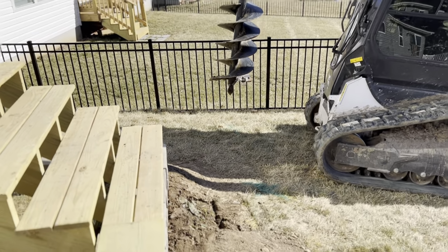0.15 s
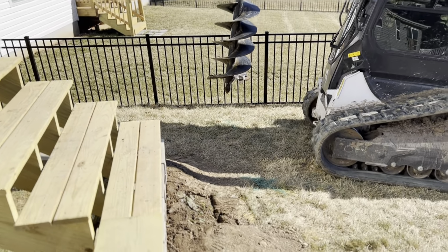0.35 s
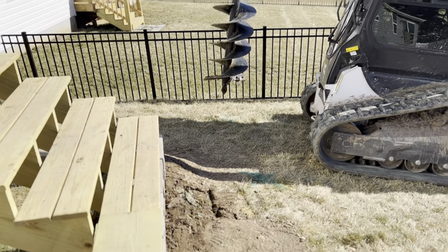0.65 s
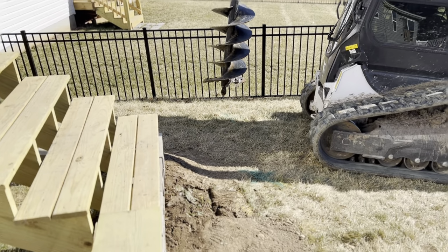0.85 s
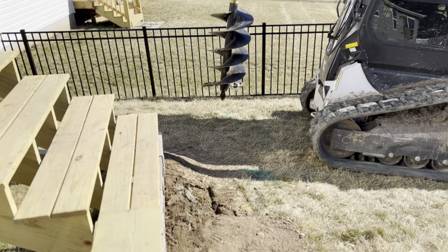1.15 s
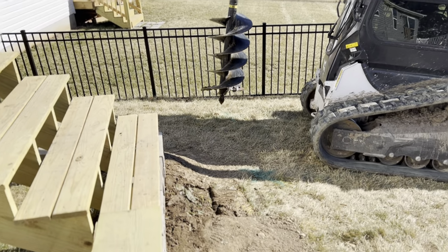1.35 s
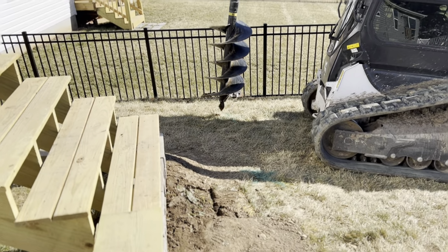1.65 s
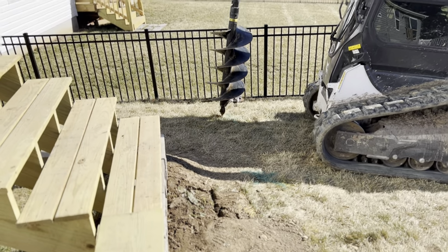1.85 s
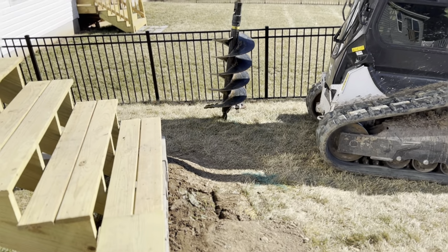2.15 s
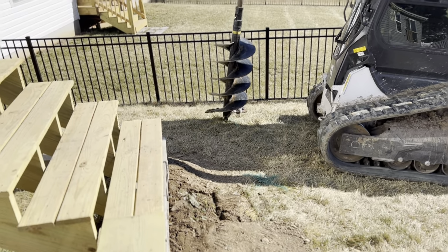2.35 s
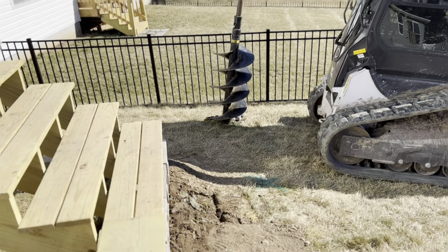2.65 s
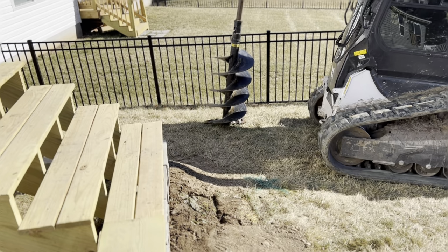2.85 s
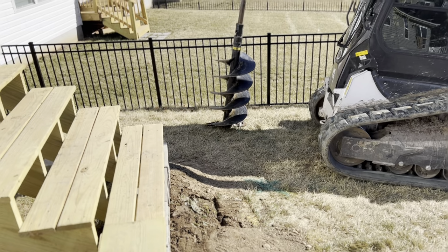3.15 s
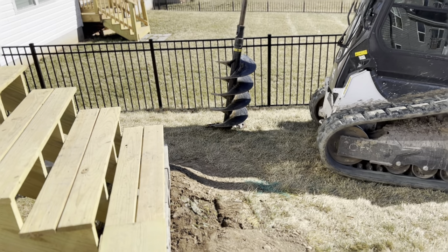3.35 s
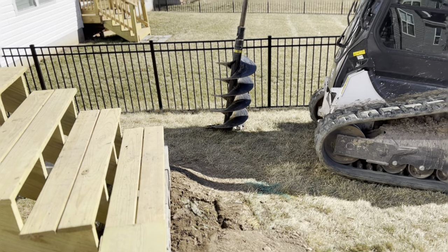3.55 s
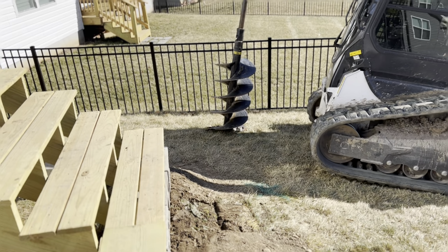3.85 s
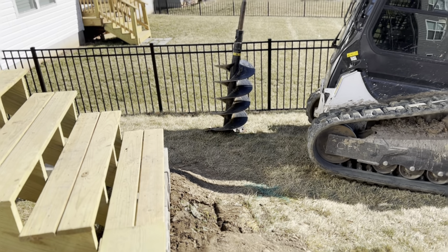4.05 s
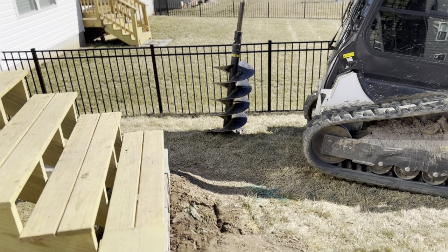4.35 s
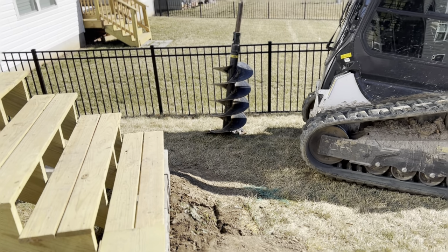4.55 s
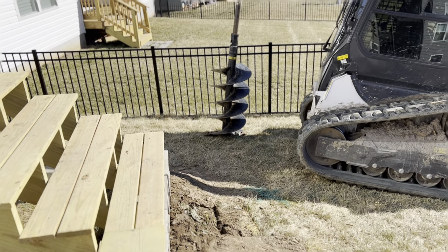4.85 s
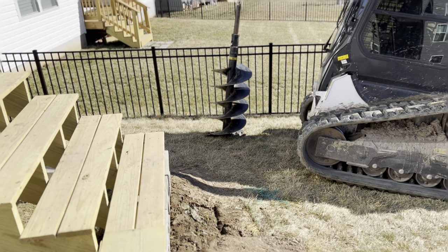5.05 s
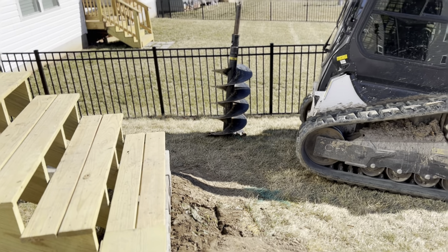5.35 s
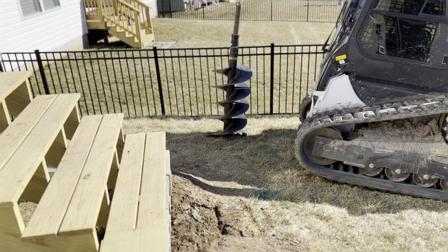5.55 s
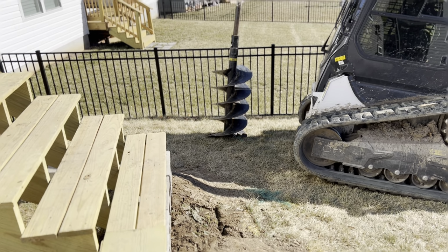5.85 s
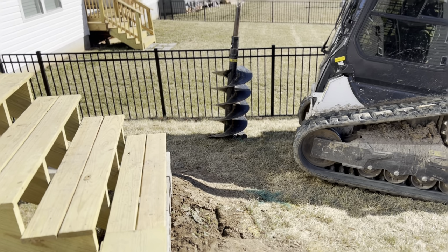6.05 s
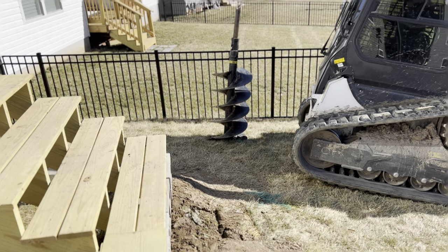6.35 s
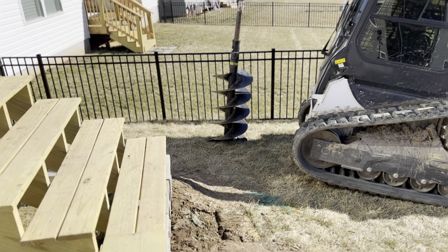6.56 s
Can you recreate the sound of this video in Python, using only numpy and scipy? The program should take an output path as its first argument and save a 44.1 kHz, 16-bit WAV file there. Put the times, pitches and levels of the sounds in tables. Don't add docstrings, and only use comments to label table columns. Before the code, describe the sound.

Steady, dense machine noise outdoors, picked up in stereo by a phone a few metres away: droning diesel exhaust, hissing injector and valve clatter, a repeating rattle and broadband fan roar. Pump whine is restrained at first, dips, then swells after three seconds as pressure builds. Short low thuds and metallic rings come from the arm after four seconds, again later, and once faintly near the end.

```python
import sys
import numpy as np
from scipy import signal
from scipy.fft import rfft, irfft, next_fast_len
from scipy.io import wavfile
from scipy.ndimage import uniform_filter1d

SR = 44100
rng = np.random.default_rng(int(sys.argv[2]) if len(sys.argv) > 2 else 0)


def file_out(sig):
    cols = np.atleast_2d(sig).T
    lim = np.clip(cols, -1, 1)
    pcm = np.round(lim * 32767).astype(np.int16)
    wavfile.write(sys.argv[1], SR, pcm)


def decibels_to_gain(level_db):
    exponent = np.asarray(level_db, float) / 20
    return 10 ** exponent


N = 295911
T = np.arange(N) / SR
SIZE = next_fast_len(N)
FREQ = np.arange(SIZE // 2 + 1) * SR / SIZE


def curves(table):
    s, *columns = np.transpose(table)
    return [np.interp(T, s, c) for c in columns]


def on_log(table, column=1):
    rows = np.array(table, float)
    return np.interp(np.log(FREQ + 1), np.log(rows[:, 0]), rows[:, column])


def between(load, free, loaded):
    return free + load * (loaded - free)


def walk(rate_hz):
    hold = int(SR / rate_hz)
    steps = np.repeat(rng.standard_normal(N // hold + 1), hold)
    return 1.3 * uniform_filter1d(uniform_filter1d(steps, hold), hold)[:N]


def ports(direct, diffuse):
    # f/Hz, left minus right/dB, likeness [0-1], left lag/rad
    port_pair = [(60, 2, 0.94, .05), (298, 0.5, 0.98, 0.15), (696, -3, 0.95, 0.86), (1130, 0.5, 0.83, 1.04),
                 (1760, -3, 0.7, 2.07), (2320, -3, 0.72, 1.1), (2370, -2.5, 0.85, .3),
                 (3080, -1.1, 0.64, 2.86), (4030, 0, 0.35, 2.57), (5400, 9.5, 0.66, 1.53),
                 (6300, -3, 0.3, 0.33), (7700, 4.5, 0.16, 1.4), (9050, -0.5, 0.5, 1.7)]
    like = np.clip(on_log(port_pair, column=2), 0, 1)
    tilt = decibels_to_gain(on_log(port_pair) / 2)
    delayed = direct * np.exp(-1j * on_log(port_pair, column=3))
    left = like * delayed + np.sqrt(1 - like ** 2) * diffuse
    return np.array([left * tilt, direct / tilt])


def noise_pair():
    return ports(*rfft(rng.standard_normal((2, SIZE))))


def bands(pair, colour, flicker_db, rate_hz, gate=lambda hz: 1):
    out = 0
    third = 3 * np.log2(FREQ + 1)
    pair = pair * decibels_to_gain(on_log(colour)) * np.sqrt(SR / 2)
    low, high = np.log2(colour[0][0]), np.log2(colour[-1][0])
    for hz in 2 ** np.arange(low, high + 1 / 3, 1 / 3):
        window = np.cos(np.pi / 2 * np.clip(third - 3 * np.log2(hz), -1, 1)) ** 2
        band = irfft(pair * window, SIZE)[:, :N]
        out = out + band * decibels_to_gain(flicker_db * walk(rate_hz)) * gate(hz)
    return out


def tone(turns, order, db, pan_db, drift, lag_rad, start_rad=None):
    if start_rad is None:
        start_rad = rng.uniform(-np.pi, np.pi)
    phase = 2 * np.pi * order * turns + start_rad + drift * walk(2.91)
    gain = np.sqrt(2) * decibels_to_gain(db + 2.7 * drift * walk(4.004))
    left = decibels_to_gain(pan_db / 2) * np.sin(phase - lag_rad)
    right = decibels_to_gain(-pan_db / 2) * np.sin(phase)
    return gain * np.array([left, right])


def engine(turns, load, drone_db):
    # order [per crank turn], unloaded/dB, loaded/dB, left minus right/dB
    exhaust = [(2.0, -24, -23, -1.5), (2.5, -68, -42, -1), (3.0, -39, -35, 1), (3.5, -84, -62, 5),
               (4.0, -34, -37.5, -0.5), (4.5, -41.5, -36.5, -6.5), (5.0, -32.5, -33.5, 0),
               (5.5, -51, -46, 18), (6.0, -38.5, -38.5, -4), (6.5, -77, -85, 2), (7.0, -28, -35.5, -0.5),
               (7.5, -49.5, -38, -6), (8.0, -49, -39, 9), (10.5, -52.5, -48, 20), (11.0, -56, -57, -15),
               (11.5, -50.5, -55, 0), (12.0, -46, -54, -12), (12.5, -48.5, -46, 9.5)]
    # order [per crank turn], unloaded/dB, loaded/dB, left minus right/dB
    gears = [(14.0, -42, -52, -1), (15.0, -43, -46.5, -3), (16.0, -40.5, -48.5, -6), (17.0, -54, -53, 18.5),
             (19.0, -56, -65, -4), (21.0, -60, -60, 15), (23.0, -47, -52.5, 1), (24.0, -44, -41.5, 2.5),
             (25.0, -48, -97, -1), (26.0, -49.5, -43, 0), (28.0, -91, -47, 2), (29.0, -58, -53, -2),
             (30.0, -77, -63, -8)]
    out = tone(turns, 2, drone_db, exhaust[0][3], 0.03, 0.08, start_rad=2.2)
    for order, free_db, loaded_db, pan_db in [*exhaust[1:], *gears]:
        blow_rad = 1.0 - 0.35 * order if order % 2 == 0 else 0.37
        lag_rad = order * (0.028 + 0.017 * rng.standard_normal())
        db = between(load, free_db, loaded_db)
        start_rad = blow_rad if order <= 8 else None
        out += tone(turns, order, db, pan_db, 0.11 + 0.014 * order, lag_rad, start_rad)
    return out


def pump(turns, load, travel_db):
    lines = [(9, -26.5, -26.5, 1, 0), (27, -33.5, -40.5, 0.47, 0.0058), (18, -27, -27, 0.058, 1),
             (36, -43.5, -44.5, 0.12, 0.18), (54, -46, -51, 0.12, .4), (10, -37.5, -31.5, 0.65, 0.079),
             (13, -36, -44.5, 0, 0.034), (20, -36.5, -48, 0, 0), (22, -40, -46.5, 0, 0.015)]
    # t/s, level/dB
    lift_pump = [
        (0, -54),
        (1.0, -43),
        (2.1, -44),
        (2.7, -53),
        (2.9, -35),
        (3.45, -26),
        (4.5, -26.5),
        (5.2, -29),
        (6.71, -29),
    ]
    # t/s, length/s, line [strokes per turn], change/dB
    valves = [(.1, 0.46, 20, -22), (.22, 0.07, 10, 11), (.52, 0.25, 10, 11.5), (1.203, 0.25, 10, 10),
              (1.75, .3, 54, 8.5), (2.1, .2, 20, -4), (2.95, 0.58, 27, -32), (3.361, 0.14, 36, 3),
              (3.36, .15, 54, 5), (3.75, 0.32, 36, -17), (3.681, 0.13, 54, -12), (4.404, 0.28, 54, 7),
              (5.25, 0.17, 10, 1), (4.85, 0.32, 54, 11), (5.198, .12, 54, 7), (5.8, .15, 36, -11),
              (5.603, 0.22, 54, 4.5), (6.0, 0.53, 20, 9), (6.0, 0.18, 27, -15), (6.3, .2, 54, 8),
              (6.45, .12, 27, -13), (3.8, .3, 27, 5), (5.35, .3, 27, 3), (5.4, .5, 36, 4),
              (6.6, 0.3, 10, -7)]
    # order [per crank turn], unloaded/dB, loaded/dB, left minus right/dB
    whistles = [(33.5, -50, -61, -8), (43.5, -50, -60, -6), (53.5, -55, -66, 0), (63.4, -55.5, -54, 3),
                (71.64, -60, -57, 1), (84, -57.5, -68, 9), (129.8, -60, -66, 6.5), (143.5, -71, -74, 3),
                (168.5, -65, -68, 0), (181, -60, -70, -3.5)]
    pans_db = 2.2, -0.8, 1.5, -3.5, -4.5, 2.2, -0.3, -3.2, 3.2
    lags_rad = -1.05, -0.4, 0.3, 0.7, -0.3, 0.3, 0.4, 0.7, -0.9
    in_step_rad = {9: -1.9, 10: -0.1}
    engaged = np.clip((load - 0.17) / 0.38, 0, 1)
    travel_swing_db = travel_db + 27
    lift_swing_db = curves(lift_pump)[0] + 27
    out = 0
    for line, pan_db, lag_rad in zip(lines, pans_db, lags_rad):
        order, free_db, loaded_db, by_travel, by_lift = line
        order = round(order)
        db = between(engaged, free_db, loaded_db) + by_travel * travel_swing_db + by_lift * lift_swing_db
        for s, length_s, valve_order, change_db in valves:
            if round(valve_order) == order:
                db = db + change_db * np.exp(-(2 * (T - s) / length_s) ** 2 / 2)
        out += tone(turns, order, db, pan_db, 0.11, lag_rad, in_step_rad.get(order))
    for order, free_db, loaded_db, pan_db in whistles:
        out += tone(turns, order, between(engaged, free_db, loaded_db), pan_db, 1.0, 0.92)
    return out


def clatter(turns, db):
    # f/Hz, density/dB per Hz
    colour = [(2200, -4), (3000, -11), (3700, -0.5), (4400, -11), (5000, -3), (5700, -6.5), (6500, -9.5),
              (7800, -9.5), (9000, -9.5), (10200, -16), (11400, -12.5), (13500, -12.5), (15000, -18.5),
              (15700, -20)]
    cylinder = np.array([1.3, 0.3, 0.9, 0.6])[(2 * turns).astype(int) % 4]
    burst = 1 + 0.17 * cylinder * np.exp(-(2 * turns % 1) / 0.25)

    def gate(hz):
        return burst * decibels_to_gain(1.4 * min(hz / 8000, 1) * walk(700))

    sound = bands(noise_pair(), colour, 1.1, 7, gate)
    return sound / np.std(sound) * decibels_to_gain(db + 1.77)


def repeating(turns, count=9):
    # f/Hz, density/dB per Hz
    colour = [(480, -77), (600, -67), (1100, -63), (1300, -68.5), (1900, -68.5), (2600, -73), (4000, -80),
              (6000, -87), (8500, -87)]
    patterns = rng.standard_normal((count, 2, 2048))
    place = ((turns / 2 % 1) * 2048).astype(int)
    age = T / T[-1] * (count - 1)
    paths = np.zeros((2, N))
    for k in range(count):
        fade = np.cos(np.pi / 2 * np.clip(age - k, -1, 1))
        paths += fade * patterns[k][:, place]
    firing = 1 + 0.5 * np.exp(-(2 * turns % 1) / 0.3)
    return bands(ports(*rfft(paths, SIZE)), colour, 1.5, 3, lambda hz: firing)


def knocks():
    # t/s, thud/dB, thud f/Hz, ring/dB, ring f/Hz
    blows = [
        (4.215, -29, 113.1, -26, 263),
        (4.263, -32, 114, -30, 345.6),
        (4.444, -19, 109.9, -24, 340),
        (4.48, -35, 113, -20.5, 262),
        (4.5, -32, 112, -28, 386),
        (4.524, -30, 124, -38, 162),
        (5.35, -38, 150, -25.5, 268),
        (5.379, -24, 107, -24, 355),
        (5.586, -25, 58.3, -36, 150.3),
        (6.399, -37, 112, -30, 344.6),
    ]
    out = np.zeros(N)
    band = signal.butter(4, [210, 720], "band", fs=SR, output="sos")
    crack = signal.sosfilt(band, rng.standard_normal(N))
    crack = crack / np.std(crack)
    for s, thud_db, thud_hz, ring_db, ring_hz in blows:
        age = np.clip(T - s, 0, None)
        decay = 3.2 * np.exp(-np.log(1000) * age / 0.12) * (1 - np.exp(-age / 0.0063))
        thud = decibels_to_gain(thud_db) * np.sin(2 * np.pi * thud_hz * age)
        ring = decibels_to_gain(ring_db) * np.sin(2 * np.pi * ring_hz * age)
        out += decay * (thud + ring + decibels_to_gain(ring_db - 8) * crack)
    return out


def ticks():
    # t/s, peak/dB, start f/Hz, end f/Hz, length/s
    pings = [
        (4.4795, -25, 9040, 9270, 0.0069),
        (4.4795, -37, 14800, 15500, .004),
        (4.479, -40, 11300, 14000, .005),
        (4.48, -39, 5200, 8000, .005),
        (3.5, -40, 3100, 3900, 0.0051),
    ]
    out = np.zeros(N)
    for s, db, start_hz, end_hz, length_s in pings:
        part = np.clip((T - s) / length_s, 0, 1)
        phase = 2 * np.pi * length_s * (start_hz * part + (end_hz - start_hz) * part ** 2 / 2)
        out += decibels_to_gain(db) * np.sin(np.pi * part ** 0.7) ** 2 * np.sin(phase)
    return out * np.array([[1.1], [0.3]])


def panel(db):
    centre_hz, width_hz = 432, 46
    ring = 1 / (1 + ((FREQ - centre_hz) / width_hz * 2) ** 2)
    sound = irfft(noise_pair() * ring, SIZE)[:, :N]
    return sound / np.std(sound) * decibels_to_gain(db + 1.5 * walk(12))


def roar(db):
    # f/Hz, density/dB per Hz
    colour = [(22, -82), (45, -68), (70, -58.5), (110, -57.5), (150, -64.5), (260, -63), (400, -58),
              (520, -64.5), (900, -64.5), (1250, -69.5), (1700, -65.5), (2500, -73), (3100, -78)]
    return bands(noise_pair(), colour, 2.14, 6) * decibels_to_gain(db)


def scene():
    # t/s, crank f/Hz, firing drone/dB, travel pump/dB
    run = [(0.0, 43.1, -23.5, -32.5), (0.5, 43.4, -23, -35), (1.3, 43.35, -23, -39),
           (1.8, 43.47, -23.5, -32), (2.2, 43.4, -23, -41), (2.9, 43.4, -25, -42), (3.25, 43.26, -24, -37),
           (3.52, 43.15, -21.5, -29), (3.75, 43.88, -24, -38), (3.95, 43.65, -23.5, -30.5),
           (4.36, 43.2, -23, -25), (4.75, 43.5, -23, -31), (5.05, 43.45, -23, -30), (5.42, 43.22, -22, -22),
           (5.8, 43.22, -21.5, -32.5), (6.1, 43.08, -22, -31.5), (6.35, 43.03, -21.5, -27.5),
           (6.56, 43.9, -22, -34.5)]
    # t/s, hydraulic load [0-1]
    load_curve = [
        (0, 0),
        (3.3, 0.22),
        (3.55, 0.39),
        (3.75, 0.68),
        (6.2, 0.54),
        (6.71, 0.6),
    ]
    crank_hz, drone_db, travel_db = curves(run)
    turns = np.cumsum(crank_hz) / SR
    load = np.clip(curves(load_curve)[0], 0, 1)
    out = engine(turns, load, drone_db) + pump(turns, load, travel_db)
    out += clatter(turns, between(load, -43.5, -44))
    out += repeating(turns) * decibels_to_gain(between(load, 0.87, -2.5))
    out += knocks() + ticks()
    out += panel(between(load, -35, -44))
    return out + roar(between(load, 0.64, 0.3))


def band_limit(x):
    return signal.sosfilt(signal.butter(12, 15730, fs=SR, output="sos"), x)


def record(dry):
    # f/Hz, gain/dB
    sum_colour = [(5400, -0.34), (5490, -3.5), (5580, -0.2), (8700, -0.8), (9200, -7), (9600, -12),
                  (9750, -60), (10850, -56), (11050, -0.5), (14300, 0.3), (15600, 2)]
    # f/Hz, gain/dB
    difference_colour = [(5400, 0.1), (5490, -9), (5580, 2.5), (8000, -0.5), (9500, 0), (11500, 1),
                         (12300, -3), (12500, -56), (14500, -60), (14900, -7), (15300, 5)]
    top_hz = 15720
    mid, side = rfft(np.array([dry[0] + dry[1], dry[0] - dry[1]]) / 2, SIZE) * (FREQ < top_hz)
    mid = mid * decibels_to_gain(on_log(sum_colour))
    side = side * decibels_to_gain(on_log(difference_colour))
    mix = irfft(np.array([mid + side, mid - side]), SIZE)[:, :N]
    return band_limit(mix)


dry = scene()
out = record(dry)
file_out(out)
```